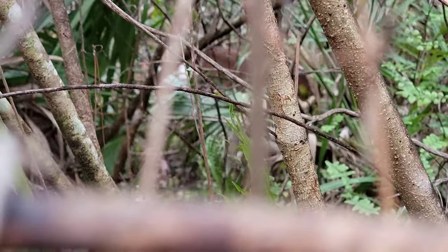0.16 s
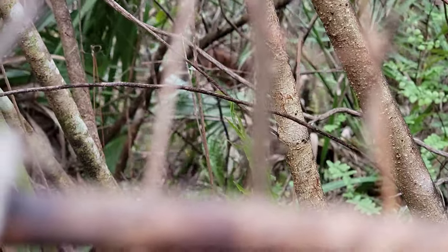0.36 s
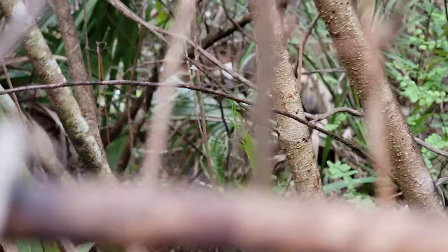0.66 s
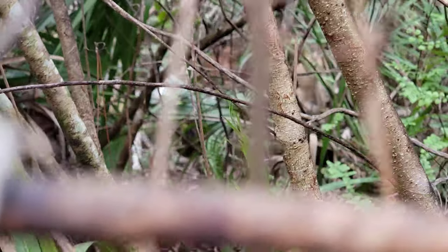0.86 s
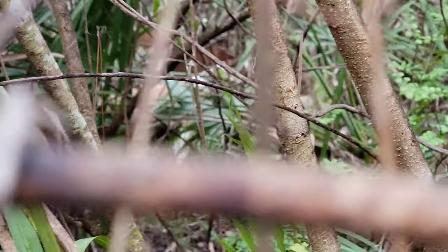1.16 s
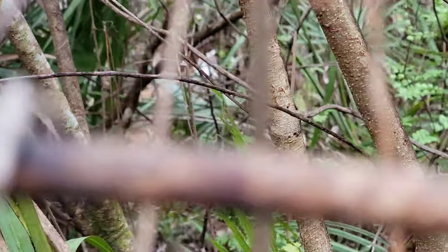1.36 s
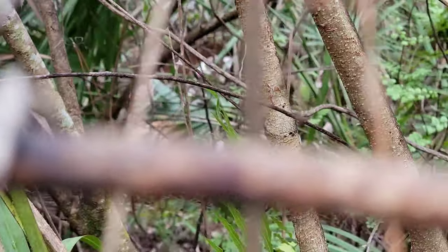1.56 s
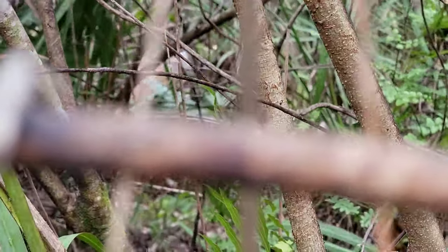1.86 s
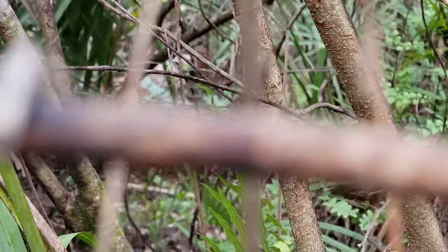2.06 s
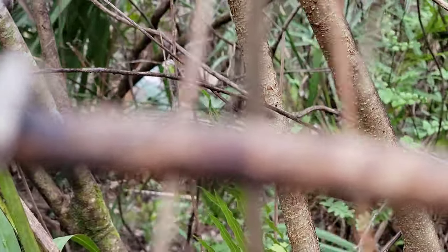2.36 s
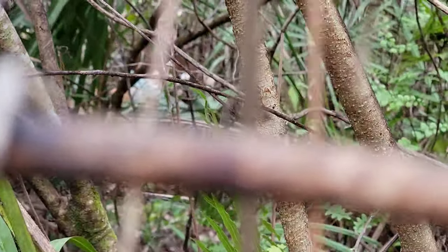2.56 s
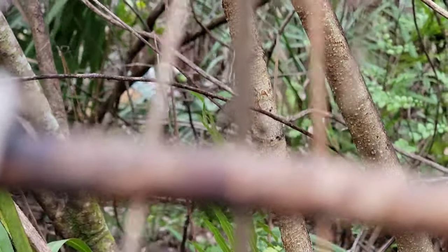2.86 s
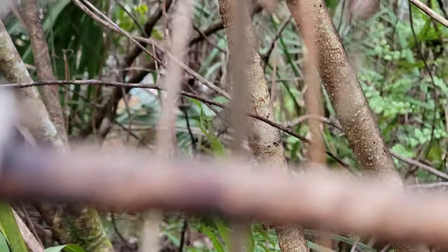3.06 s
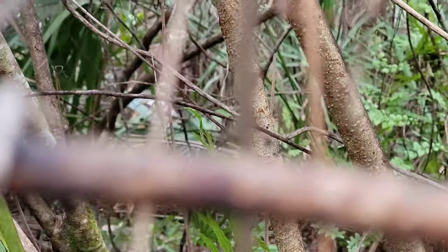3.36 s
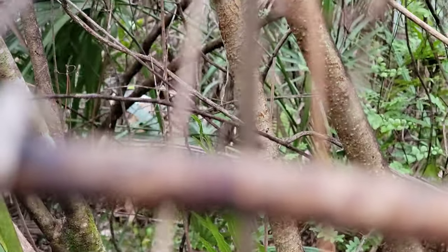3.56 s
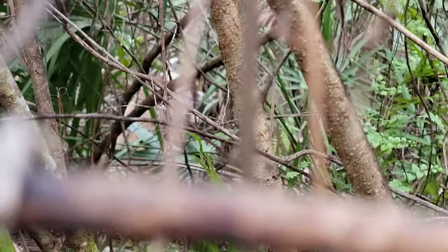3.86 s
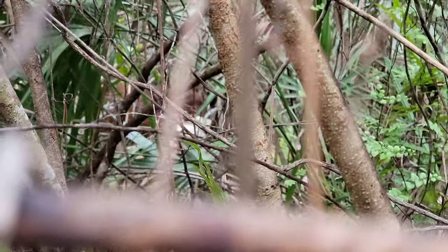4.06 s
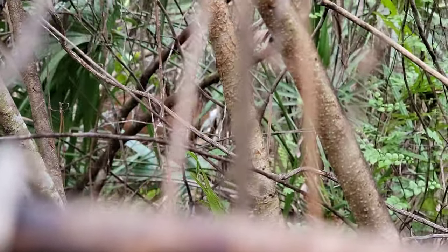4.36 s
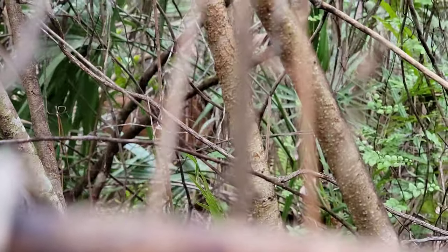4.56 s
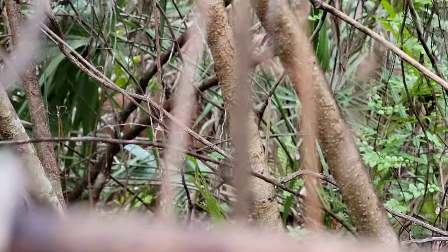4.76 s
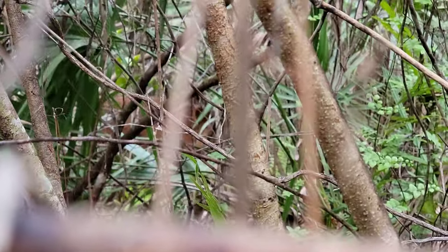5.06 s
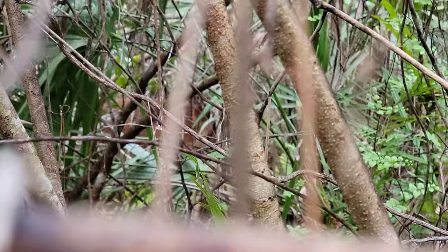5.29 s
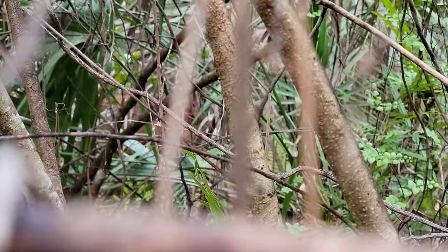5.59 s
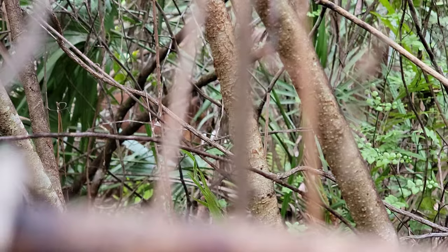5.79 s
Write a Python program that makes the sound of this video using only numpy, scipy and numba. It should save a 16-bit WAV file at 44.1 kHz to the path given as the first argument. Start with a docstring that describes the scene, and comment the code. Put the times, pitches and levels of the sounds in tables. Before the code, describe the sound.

A handheld stereo microphone in dense undergrowth catches quick raspy dog barks, one clearing to a short yelp, then low throaty hog grunts and breaths. Leaves thrash, dry twigs crack, and a single strong bark interrupts. The hog roars in long growls, bursts into a shrill scream, drops to airy calls and a faint whine, then roars into another squeal still sounding at the end.

```python
"""Dog and caught hog in thick brush; a deep noise, strongest near 65 Hz, swells and fades with the growls.
0-0.6 s: hoarse dog barks (rough clicks through mouth resonances), one clearing into a falling yelp; leaves
rustle in patches (noise of moving level) until about 4.1 s, then almost vanish; from 0.7 s: hog grunts (slow
larynx flaps, breath), one more bark at 1.2 s, twigs snapping (decaying noise); from 2.6 s: roars; they break
into squeals (fast chaotic flaps, moving throat) at 4.1 s and 5.2 s, with ringing whistles, and softer calls and
a thin whine between the squeals."""
import sys
import numpy as np
from scipy import signal
from scipy.fft import rfft, irfft, next_fast_len
from scipy.io import wavfile
from scipy.ndimage import uniform_filter1d, minimum_filter1d
from numba import njit

SR = 44100
rng = np.random.default_rng(int(sys.argv[2]) if len(sys.argv) > 2 else 0)


def output_pcm(signal):
    """Save a mono or channel-first signal as 16-bit PCM at the path in sys.argv[1].

    Samples are clipped to [-1, 1] before scaling.
    """
    pcm = np.clip(np.atleast_2d(signal).T, -1, 1) * 32767
    wavfile.write(sys.argv[1], SR, np.round(pcm).astype(np.int16))


N = 261505


def amp(db):
    """dB to gain."""
    return 10 ** (np.asarray(db) / 20)


def rms_one(x):
    """Scale to unit power."""
    return x / np.sqrt(np.mean(x ** 2) + 1e-20)


def in_time(rows, silent_db=None):
    """Columns at every sample; the first may fall silent outside the table."""
    t = np.arange(N) / SR
    s, *columns = np.transpose(rows)
    out = [np.interp(t, s, c) for c in columns]
    if silent_db is not None:
        out[0] = np.interp(t, s, columns[0], silent_db, silent_db)
    return out


def held(rows):
    """Each row's columns last from its time to the next row's, with a short glide."""
    s, *columns = np.transpose(sorted(rows))
    latest = np.maximum(np.searchsorted(s, np.arange(N) / SR) - 1, 0)
    return uniform_filter1d(np.array(columns)[:, latest], size=400, axis=1)


def at_hz(points, column=1, size=N):
    """A spectrum column at every FFT bin, interpolated over log frequency."""
    points = np.array(points)
    hz = np.arange(size // 2 + 1) * SR / size + 1e-3
    return np.interp(np.log(hz), np.log(points[:, 0]), points[:, column])


def drift(corner_hz):
    """Slow chance: noise through two equal low-pass poles, unit power."""
    r = np.exp(-2 * np.pi * corner_hz / SR)
    slow = signal.lfilter([1], [1, -2 * r, r * r], rng.standard_normal(N + SR))
    return rms_one(slow[SR:])  # settled part


def coloured(spectrum, channels=1):
    """Noise of a given spectrum, unit power."""
    white = rfft(rng.standard_normal((channels, N)))
    return rms_one(irfft(white * amp(at_hz(spectrum)), N))


@njit
def moving_filter(x, cosine, r):
    """Two-pole resonance whose centre and width move sample by sample, gain 1 on top."""
    y = np.zeros(len(x))
    for i in range(2, len(x)):
        drive = (1 - r[i] ** 2) / 2 * (x[i] - x[i - 2])
        y[i] = drive + 2 * r[i] * cosine[i] * y[i - 1] - r[i] ** 2 * y[i - 2]
    return y


def resonance(x, hz, width_hz):
    """Two passes for dark valleys, width_hz each; unit white noise comes out at unit power."""
    r = np.exp(-np.pi * width_hz / SR) * np.ones(N)
    cosine = np.cos(2 * np.pi * hz / SR) * np.ones(N)
    once = moving_filter(x, cosine, r)
    return moving_filter(once, cosine, r) * np.sqrt(2 * SR / (np.pi * width_hz))


def flaps(per_s, jitter, uneven_db):
    """One click for each closing of the larynx, uneven in time and strength; unit power."""
    turns = np.cumsum(per_s * np.exp(jitter * drift(np.mean(per_s) * .6))) / SR
    cycle = np.floor(turns).astype(int)
    mean_power_gain = amp(uneven_db ** 2 * np.log(10) / 20)
    strength = amp(uneven_db * rng.standard_normal(N)) / mean_power_gain
    return np.diff(cycle, prepend=0) * strength[cycle] * np.sqrt(SR / per_s)


def puffed(clicks, puff_s, puff_share):
    """Each click drags a short puff of turbulent air, drawn anew on every call."""
    r = np.exp(-1 / (puff_s * SR))
    envelope = np.sqrt(1 - r * r) * signal.lfilter([1], [1, -r], clicks)
    puffs = envelope * rng.standard_normal(N)
    return np.sqrt(1 - puff_share) * clicks + np.sqrt(puff_share) * puffs


def calls(rows):
    """Summed gain of calls that swell quickly, hold and die away (60 dB in the fall time)."""
    gain, t = np.zeros(N), np.arange(N) / SR
    for start, rise, hold, fall, db, *_ in rows:
        swell = np.clip((t - start) / rise, 0, 1)
        fallen = np.clip((t - start - rise - hold) / fall, 0, 3)
        gain += swell * amp(db - 60 * fallen ** 2)
    return gain


def tone(rows, partials, waver_db):
    """A wavering clear tone: sine partials along (time [s], pitch [Hz], level [dB]) rows."""
    level_db, pitch_hz = in_time(np.array(rows)[:, [0, 2, 1]], silent_db=-98.0)
    phase = 2 * np.pi * np.cumsum(pitch_hz * (1 + .008 * drift(40))) / SR
    level = uniform_filter1d(amp(level_db), size=300) * amp(waver_db * drift(45))
    return np.sqrt(2) * level * sum(amp(db) * np.sin(k * phase) for k, db in partials)


def air():
    """Steady background noise of a fixed spectrum."""
    # background spectrum: (frequency [Hz], relative density [dB])
    air_spectrum = [(24, -40), (40, -3), (81, -31), (429, -12), (707, 12), (1080, 6), (2290, 1.5),
                    (6530, -29), (9500, -57), (12500, -61), (15700, -46)]
    return amp(-42) * coloured(air_spectrum)[0]


def rumble():
    """Deep noise, strongest near 65 Hz, swelling and fading with the growls; partly common to left and right."""
    # rumble strength: (time [s], mean level [dB])
    rumble_levels = [(0.0, -51.5), (.5, -42), (1.3, -47.5), (2.0, -41), (2.4, -47.5), (2.9, -35.5),
                     (3.5, -44.5), (3.66, -42.5), (3.93, -33), (4.15, -51), (5.93, -47)]
    # rumble spectrum: (frequency [Hz], relative density [dB])
    rumble_spectrum = [(20, -32), (40, -1.5), (65, 9.5), (140, -0.5), (300, -8), (800, -51)]
    common_left_right = coloured(rumble_spectrum, channels=3)
    level = amp(in_time(rumble_levels)[0] + 2.9 * drift(4.7))
    return level * (common_left_right[0] + 0.94 * common_left_right[1:])


def brush():
    """Leaves rustle in patches until about 4.1 s; each snapped twig is a crack and a dying rattle."""
    # leaf rustle: (time [s], mean level [dB])
    leaves = [(0.0, -42), (.95, -29.5), (1.69, -32.5), (2.05, -28), (2.19, -43), (2.64, -42.5), (2.91, -40),
              (3.16, -33.5), (3.33, -43.5), (3.76, -40.5), (4.1, -29.5), (4.2, -61), (4.7, -76), (5.0, -49),
              (5.93, -61)]
    # twig snaps: (time [s], reference level [dB], rattle t60 [s])
    snaps = [(1.082, -25, 0.12), (1.1516, -28, 0.059), (1.3716, -19, 0.42), (1.6515, -21.5, 0.06),
             (1.735, -26, 0.044), (1.8034, -27, 0.04), (1.844, -18.5, 0.11), (2.094, -15, 0.079),
             (2.526, -29.5, 0.017), (3.569, -31, 0.067), (4.024, -23.5, 0.085), (4.1094, -17, 0.055)]
    # rustle and snap spectrum: (frequency [Hz], relative density [dB])
    rustle = [(880, -2), (1500, 3.5), (1880, -32.5), (2110, 2.5), (2620, -1), (3320, -6.5), (6600, -12.5),
              (8440, -26), (11000, -17.5), (12900, -7), (15100, -17.5), (15700, -1)]
    rattle_db, crack_db, crack_t60_s = -10, 0.5, 0.019  # dB against each snap's reference
    level = amp(in_time(leaves)[0] + 2.2 * drift(10))
    for s, db, t60_s in snaps:
        first = round(s * SR)
        age_s = np.arange(N - first) / SR
        level[first:] += amp(db + rattle_db - 60 * age_s / max(t60_s, .005))
        level[first:] += amp(db + crack_db - 60 * age_s / crack_t60_s)
    return level * coloured(rustle)[0]


def dog():
    """Barks: throbbing clicks and puffs ring in chest and mouth; the long one clears into a falling yelp."""
    # barks: (start [s], rise [s], hold [s], fall [s], peak [dB], mouth resonance [Hz],
    # chest [dB against level], upper resonances [dB against level, before offsets])
    barks = [ (.01, 0.015, 0.0076, 0.14, -20, 706, -23, -21),
             (0.106, 0.013, 0.011, 0.024, -21.5, 760, -17, -42),
             (.168, 0.012, 0.048, 0.14, -30, 760, -10, -18),
             (.222, 0.0058, 0.0056, 0.032, -23, 800, -11, -21),
             (0.249, 0.012, 0.022, 0.061, -24, 750, -3, -26),
             (0.289, .015, 0.046, .13, -19, 710, -15, -17.5),
             (0.391, 0.025, 0.0038, 0.23, -25, 686, -39, -12.5),
             (1.241, 0.012, 0.0028, 0.067, -4.5, 800, -18, -16.5), ]
    # clear core of the long bark: (time [s], pitch [Hz], level [dB])
    yelp = [(0.33, 800, -26), (0.395, 780, -19.5), (0.435, 649, -11.5), (0.46, 540, -29.5)]
    # yelp partials: (multiple of pitch, level [dB])
    yelp_partials = [(1, 0), (3 / 2, -9), (2, -22), (5 / 2, -24), (7 / 2, -26)]
    flaps_per_s = 340
    mouth_hz, chest_db, upper_db = held([(b[0], *b[5:]) for b in barks])
    throb = amp(2.8 * drift(45))
    cords = flaps(flaps_per_s * np.ones(N), jitter=.1, uneven_db=2.5) * calls(barks) * throb
    hoarse = puffed(cords, 0.0025, 0.63)
    out = amp(-3.0) * resonance(hoarse, mouth_hz, 436)
    out -= amp(-12.0) * resonance(hoarse, 1240, 410)
    out += resonance(amp(chest_db) * puffed(cords, 0.00043, 0.87), 216, 165)
    out += resonance(amp(upper_db - 1.5) * hoarse, 1870, 760)
    out -= resonance(amp(upper_db - 7.5) * hoarse, 2810, 750)
    return out + tone(yelp, yelp_partials, waver_db=1.2)


def hog_controls():
    """Gain, flap rate, turn to squeal, breath share, levels and pitches of the resonances."""
    # grunts and pants: (start [s], rise [s], hold [s], fall [s], peak [dB], lowest throat resonance [Hz],
    # flaps [per s], breath share [0-1], chest, throat 1-4, snout [dB against level])
    grunts = [ (0.698, .01, 0.035, 0.15, -25.5, 335, 48.1, 0.64, 0, -9, 4, -7, -16, -31),
              (.75, 0.011, 0.0073, 0.24, -18, 320, 47.9, 0.86, -5.5, -15, -4, -8, -18, -20),
              (0.919, 0.005, 0.015, 0.25, -20.5, 337, 49.97, .45, -4.5, -38, -4.5, -12, -11, -20),
              (.98, 0.021, .05, 0.2, -29.5, 320.9, 40.22, .6, -4.5, -3.5, -11, -9.5, -11, -24),
              (1.088, 0.014, 0.01, 0.34, -25, 320, 45.1, .85, 1.5, -14, -3, -14, -15, -27),
              (1.328, 0.046, 0.012, 0.32, -22.5, 372, 44.7, 0.89, -25, -38, -17.5, -8, -14.5, -20),
              (1.548, 0.075, .01, 0.044, -31.5, 374, 49.46, .85, -4.5, -31, -8, -15, -9, -18),
              (1.646, 0.011, 0.12, 0.066, -18, 423, 65, .18, -3.5, -17, -8.5, 0, 1, -13.5),
              (1.73, 0.016, 0.043, 0.15, -17, 420, 65, 0.19, -9.5, -14, -10.5, -5.5, -10.5, -10.5),
              (1.85, 0.0081, 0.018, 0.17, -19, 420, 64, 0.22, -7.5, -30, -2, -12, -16, -15),
              (1.923, 0.031, 0.043, 0.057, -23, 411.2, 64, 0.22, -3, -11.5, 6, 1, -6.5, -5),
              (2.01, .02, 0.037, 0.14, -22, 407, 64, 0.23, -9, -19.5, 5.5, -14, -13, -19),
              (2.073, 0.013, 0.039, 0.2, -5, 477, 63, .24, -24, -19, -18, -7.5, -20, -23),
              (2.242, 0.0056, 0.0046, 0.036, -28, 370.9, 61.7, 0.51, -15, -34.5, -6, -7, -35, -35.5),
              (2.372, 0.065, 0.0087, 0.11, -36.5, 373, 60, 0.89, -14, -35, -18, 7.5, -18, 1.5),
              (3.41, 0.014, 0.026, 0.069, -55, 328, 55.01, 0.74, -10, -20, -14, 5, -15, -13),
              (3.471, 0.034, 0.0047, 0.036, -39, 330, 55, 0.4, -1.5, -13, -17, 3.5, -22, -17),
              (3.57, 0.053, 0.041, 0.048, -52, 325.3, 54.77, 0.79, -17, -22, -20, 0, -16, 0),
              (4.679, 0.018, .15, .15, -33, 449, 65, 1, -28, -27, -10, -17, -13, -19.5),
              (4.889, .012, 0.0063, 0.15, -49.5, 446.5, 65, 0.92, -5, -27, 2.5, -8, -19, -35.5),
              (4.945, 0.11, 0.011, 0.16, -15.5, 413, 63, .9, -26, -23.5, 0, -1.5, -16, -31), ]
    # long roars, one table each: (time [s], level [dB], lowest throat resonance [Hz])
    roars = [
        [(2.558, -52, 383.8), (2.57, -20, 372.7), (2.645, -19, 384), (2.9, -17, 500), (3.21, -17, 509.8),
         (3.355, -18.5, 502), (3.385, -67, 517.3)],
        [(3.68, -63, 320), (3.695, -27.5, 320), (3.8, -13, 340.3), (3.87, -15.5, 396.6), (4.05, -9.5, 540),
         (4.13, 3.5, 538.3), (4.28, -9, 530), (4.5, -12, 624), (4.58, -14, 610.6), (4.65, -20.5, 597),
         (4.69, -49, 597)],
        [(5.06, -39, 607), (5.075, -34, 596), (5.13, -19, 614.8), (5.19, -8, 599.5), (5.22, -10, 573.9),
         (5.35, -8, 605), (5.63, -11.5, 589), (5.93, -8.5, 604.7)],
    ]
    # growling start of each roar: (flaps [per s], breath share [0-1], chest, throat 1-4, snout [dB])
    roar_voices = [(60.99, .17, -10.5, -3.5, -13, -1, -4, -9), (64, .2, -13.5, -7.5, -6, -8, -14.5, -14),
                   (63, .2, -13, -15.5, -6.5, -24, -29.5, -31)]
    # squeals: (start [s], end [s], weight shift from throat 2 to 3 [dB per s], breath share [0-1],
    # chest, throat 1-4, snout [dB]); throat 2 and 3 as at the start
    squeals = [(4.101, 4.677, 8.7, .35, -28, -12, 0.0015, -9.5, -12.5, -13.5),
               (5.202, 6.0, 2.5, .33, -38, -12, 0, -9, -14.5, -12)]
    # mouth opening: (lowest resonance [Hz], throat 2-4 [Hz], snout [Hz])
    growl_throat = [(320, 685, 1050, 1813, 3000), (420, 715, 1261, 1760, 2930),
                    (540, 848, 1374, 1890, 2810), (620.7, 1210, 1680, 2180, 2933)]
    # throat 2-4 and snout as a squeal starts [Hz]
    squeal_throat_hz = [1172.5, 1601, 2050, 3004]
    # their climb while it lasts [Hz per s]
    strain_hz_per_s = [165, 120, 150, 800]
    break_s = .07
    t, gain = np.arange(N) / SR, calls(grunts)

    rows = [(g[0], *g[5:]) for g in grunts]
    rows += [(r[0][0], r[0][2], *v) for r, v in zip(roars, roar_voices)]
    lowest_hz, per_s, *voice = held(rows)
    for roar in roars:
        level_db, hz = in_time(roar, silent_db=-np.inf)
        gain = gain + amp(level_db)
        lowest_hz = np.where(np.isfinite(level_db), hz, lowest_hz)
    key_hz, *upper = np.transpose(growl_throat)
    upper_hz = np.array([np.interp(lowest_hz, key_hz, c) for c in upper])

    start, _, shift_db, *tense = held([(row[0] - break_s, *row) for row in squeals])
    turned = sum(np.interp(t, [a - break_s / 2, a + break_s / 2, b, b + break_s], [0, 1, 1, 0])
                 for a, b, *_ in squeals)
    age_s = t - start
    strained_hz = np.array(squeal_throat_hz)[:, None] + np.outer(strain_hz_per_s, age_s)
    tense[3] = tense[3] - shift_db * age_s  # throat 2
    tense[4] = tense[4] + shift_db * age_s  # throat 3

    breath, *db = (1 - turned) * np.array(voice) + turned * np.array(tense)
    resonances_hz = [lowest_hz, *((1 - turned) * upper_hz + turned * strained_hz)]
    return gain, per_s, turned, np.clip(breath, 0, 1), db, resonances_hz


def hog():
    """Slow flaps growl, fast chaotic flaps squeal; with breath they excite chest, throat and snout."""
    # chest: (frequency [Hz], width before widening [Hz], level [dB])
    chest_modes = [(65, 44.4, -9.5), (132.4, 67.4, -6.5), (204, 62.4, -4.5), (286, 68, -8.5)]
    # snout: (share of snout frequency, width in a growl [Hz], level in a growl [dB])
    snout_modes = [(.82, 430, -2), (1.001, 360, -1), (1.13, 460, -8), (1.5, 1660, -20.5)]
    # added squeal resonances: (frequency [Hz], width [Hz], level [dB against level])
    squeal_edge = [(318, 75, -29), (1935, 780, -3.5), (4990, 670, -20.5), (6360, 540, -30),
                   (12950, 2300, -29)]
    # widths of throat 1-4 in a growl [Hz]
    growl_widths_hz = [100, 130, 210, 270]
    # the same in a squeal [Hz]
    squeal_widths_hz = [160, 220, 130, 150]
    # thin whine between squeals: (time [s], pitch [Hz], level [dB] before partials)
    whine = [(4.76, 779, -42.5), (4.792, 781, -58), (4.93, 839, -45.5)]
    # tones breaking out of the squeal: (start [s], length [s], first pitch [Hz], last pitch [Hz], level [dB])
    whistles = [(4.068, 0.21, 1030, 1234, -14), (4.3, .14, 1611, 1610, -17),
                (4.409, .19, 1617, 1688, -15.5), (4.603, 0.057, 1448, 1250, -21),
                (5.024, 0.3473, 1219, 1189, -29), (5.403, 0.72, 1255, 1365, -21)]
    squeal_per_s, squeal_share, treble_swell_s = 334.7, 0.91, 0.043
    chest_widening = 1.73
    snout_focus, squeal_notch_db = .35, -9  # a squeal narrows the snout modes, mutes the lowest
    gain, per_s, turned, breath, levels_db, resonances_hz = hog_controls()
    chest_db, *throat_db, snout_db = levels_db
    *throat_hz, snout_hz = resonances_hz
    squeal = squeal_share * turned
    growl = flaps(per_s, jitter=.035 + .7 * breath ** 2, uneven_db=2.)
    shriek = flaps(squeal_per_s * np.ones(N), jitter=.2, uneven_db=-5.5)

    def source(puff_share):
        """Voice and breath, with fresh level drift so each resonance group is favoured at other times."""
        favour = amp(2.3 * drift(30) + 1.8 * drift(7))
        flap = puffed(growl, .0015, puff_share) * favour
        voiced = np.sqrt(1 - squeal) * flap + np.sqrt(squeal) * puffed(shriek, 0.0032, 0.7)
        hiss = 0.86 * rng.standard_normal(N)
        return gain * (np.sqrt(1 - breath) * voiced + np.sqrt(breath) * hiss)

    chest = amp(chest_db) * source(0.08)
    out = sum(amp(db) * resonance(chest, hz, chest_widening * width) for hz, width, db in chest_modes)

    throat = zip(throat_hz, throat_db, growl_widths_hz, squeal_widths_hz)
    for k, (hz, db, width, tense) in enumerate(throat):
        tremble = 1 + .026 * drift(25)
        width_hz = width + turned * (tense - width)
        out += (-1) ** k * resonance(amp(db) * source(.2), hz * tremble, width_hz)

    snout = amp(snout_db) * source(.3)
    for k, (share, width, db) in enumerate(snout_modes):
        notch_db = (k == 0) * squeal_notch_db * turned
        ring = resonance(snout, share * snout_hz, width * (1 - snout_focus * turned))
        out += (-1) ** k * amp(db + notch_db) * ring

    # the squeal's added resonances come up late
    lag = np.exp(-1 / (treble_swell_s * SR))
    swollen = np.minimum(squeal, signal.lfilter([1 - lag], [1, -lag], squeal))
    wide_open = swollen ** 2 * source(.6)
    out += sum(amp(db) * resonance(wide_open, hz, width) for hz, width, db in squeal_edge)

    out += tone(whine, [(1, 7.5), (2, 2.5)], waver_db=5.0)
    for s, length, first, last, db in whistles:
        out += tone([(s, first, db), (s + length, last, db)], [(1, 0)], waver_db=3.5)
    return out


def ports(x):
    """Two ports: straight sound with a phase lead, plus a short diffuse tail, different left and right."""
    # port pair: (frequency [Hz], left minus right [dB], left lead [rad], straight share [0-1])
    port_pair = [(60, 0.5, 0.077, 0.97), (500, 0.5, 0.031, 0.98), (800, -4, 0.047, 0.87),
                 (1390, -3.5, 1.28, 0.9), (1904, -1, 1.36, 0.87), (2280, -4, 2.87, 0.91),
                 (3780, 3.5, 5.9, 0.66), (4000, 3.5, 18, 0.07), (7440, 13, 4.2, 1), (13840, 7, 69.7, 0)]
    tail_t60_s, variation_hz = 0.066, 8.6
    size = next_fast_len(N + SR // 2)
    straight = np.clip(at_hz(port_pair, column=3, size=size), 0, 1)
    lead = at_hz(port_pair, column=2, size=size)
    side = np.array([[.5], [-.5]])
    decay = amp(-60 * np.arange(size) / SR / tail_t60_s)
    tails = rfft(rng.standard_normal((2, 2, size)) * decay)
    tails /= np.sqrt(uniform_filter1d(abs(tails) ** 2, size=1500))  # even spectrum
    # slowly varying mix of two noise tails, its angle drawn apart for left and right
    angle = 2.35 * np.array([drift(variation_hz), drift(variation_hz)])
    diffuse = rfft(x * np.cos(angle), size) * tails[0] + rfft(x * np.sin(angle), size) * tails[1]
    direct = rfft(x, size) * np.exp(1j * side * lead)
    both = straight * direct + np.sqrt(1 - straight ** 2) * diffuse
    return irfft(both * amp(side * at_hz(port_pair, size=size)), size)[:, :N]


def scene():
    """Animals, brush and background noise through the ports; rumble added after them."""
    return ports(hog() + dog() + brush() + air()) + rumble()


def record(dry):
    """Deep bass is lost, a fast limiter holds down peaks, the top is cut."""
    limit, bass_cut_hz, stopband_hz = .8, 48, 15900
    high_pass = signal.butter(4, bass_cut_hz, "high", fs=SR, output="sos")
    dry = signal.sosfilt(high_pass, dry)
    peak_gain = np.minimum(1, limit / (abs(dry).max(axis=0) + 1e-9))
    room_left = minimum_filter1d(peak_gain, size=301)
    limited = dry * uniform_filter1d(room_left, size=301) ** .85
    low_pass = signal.cheby2(20, 70, stopband_hz, fs=SR, output="sos")
    return np.clip(signal.sosfilt(low_pass, limited), -1, 1)


dry = scene()
out = record(dry)
output_pcm(out)
```